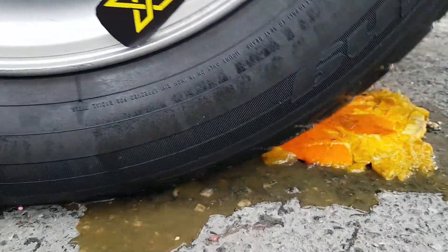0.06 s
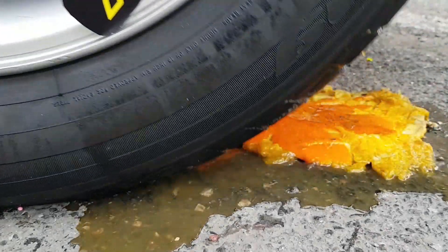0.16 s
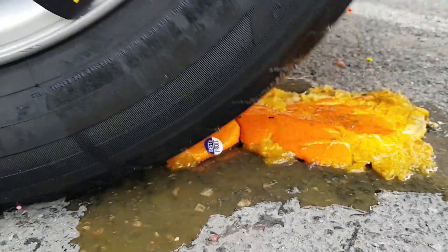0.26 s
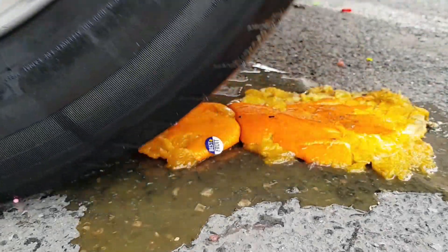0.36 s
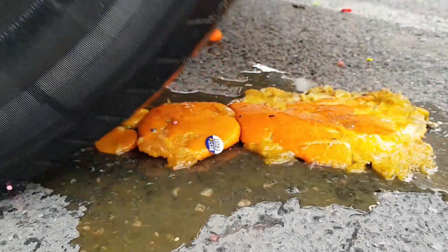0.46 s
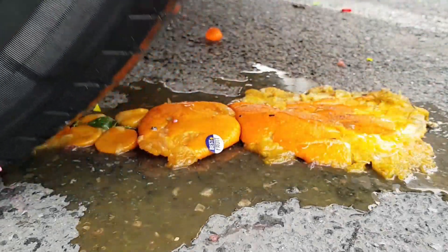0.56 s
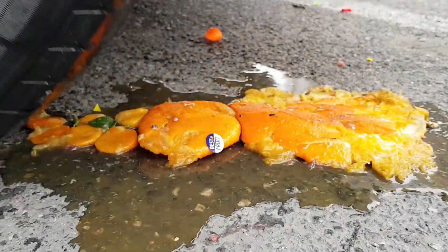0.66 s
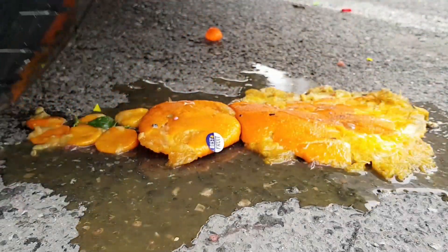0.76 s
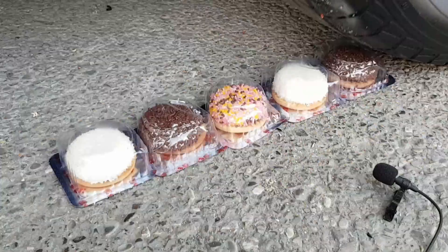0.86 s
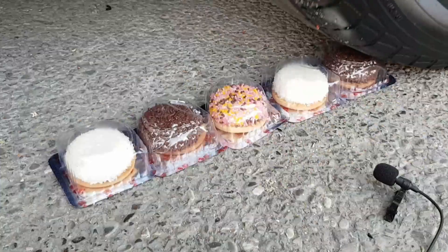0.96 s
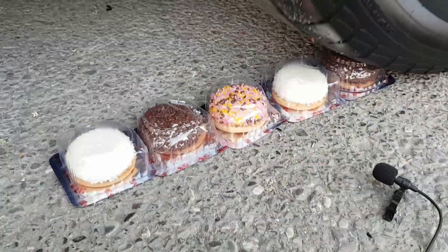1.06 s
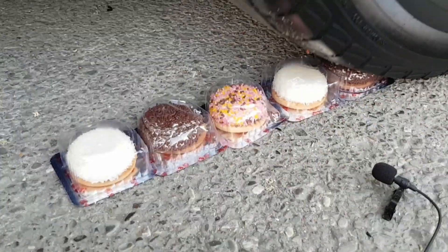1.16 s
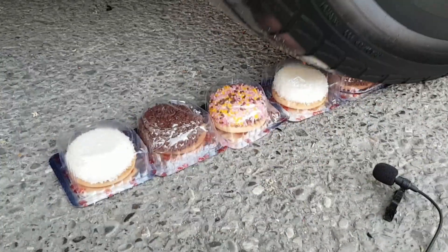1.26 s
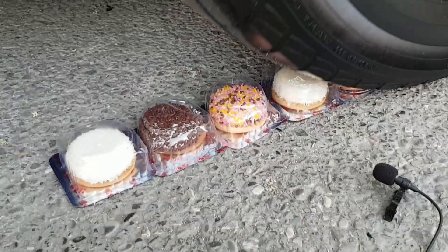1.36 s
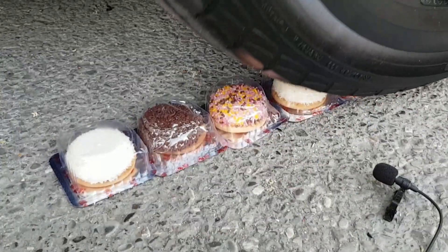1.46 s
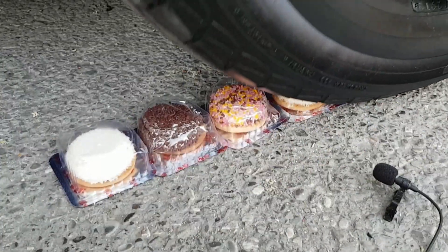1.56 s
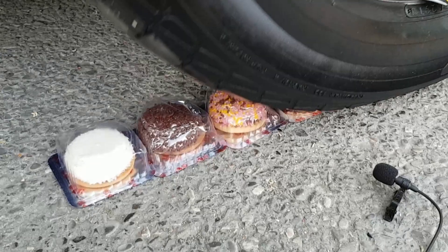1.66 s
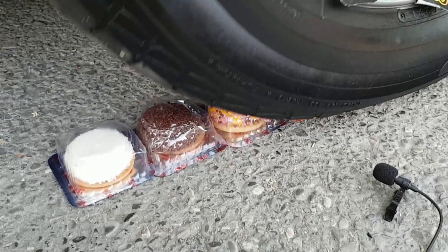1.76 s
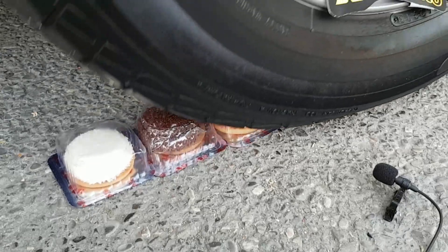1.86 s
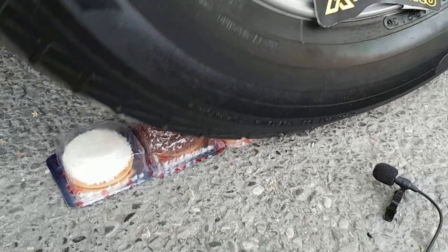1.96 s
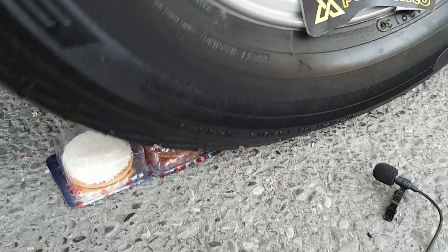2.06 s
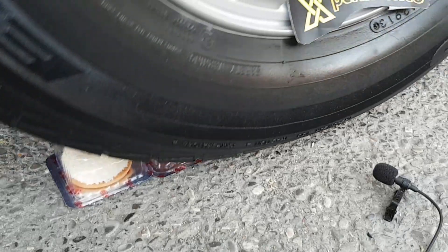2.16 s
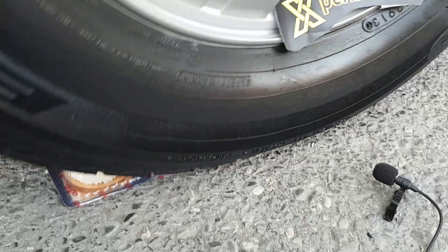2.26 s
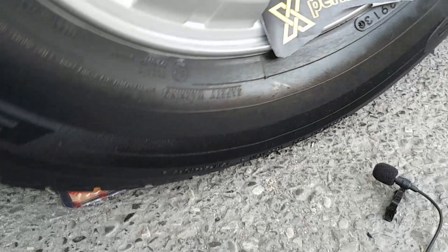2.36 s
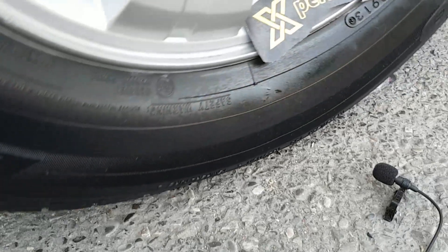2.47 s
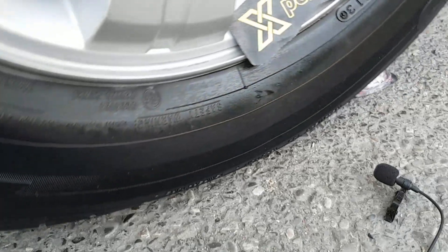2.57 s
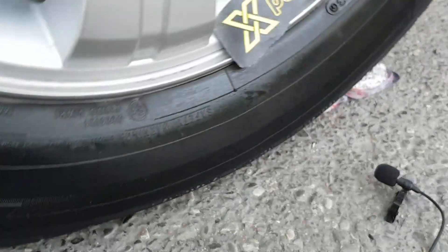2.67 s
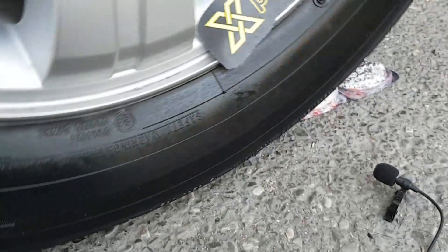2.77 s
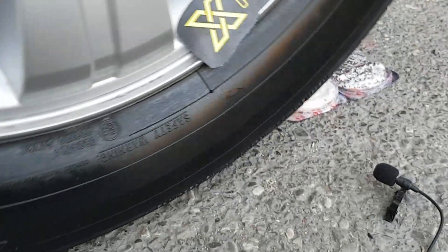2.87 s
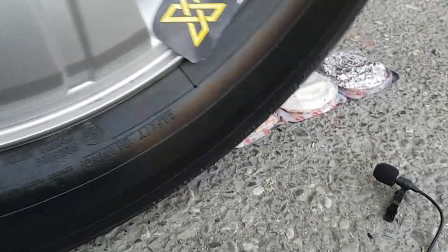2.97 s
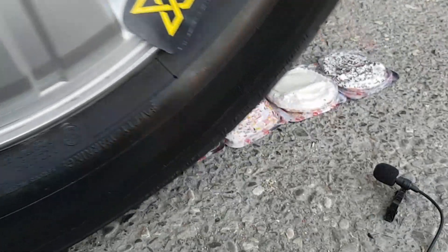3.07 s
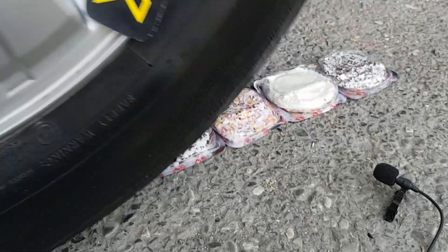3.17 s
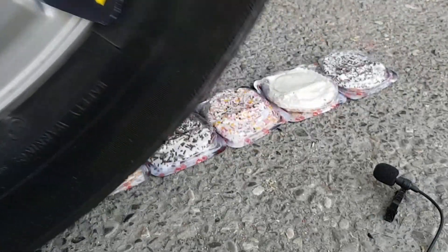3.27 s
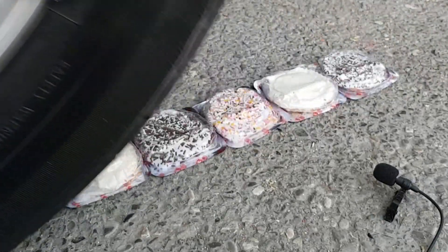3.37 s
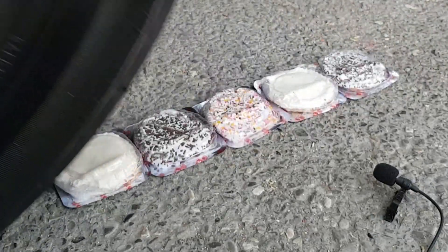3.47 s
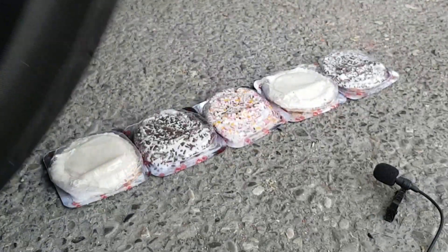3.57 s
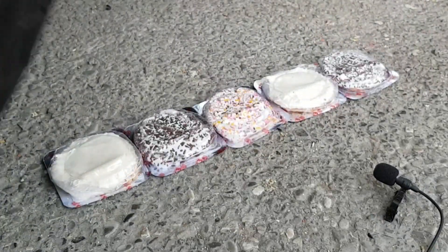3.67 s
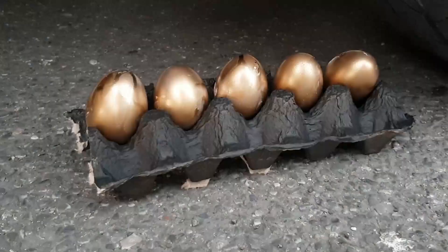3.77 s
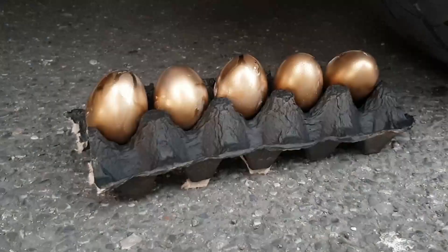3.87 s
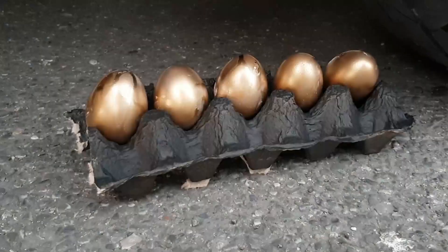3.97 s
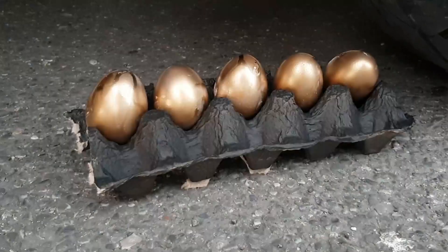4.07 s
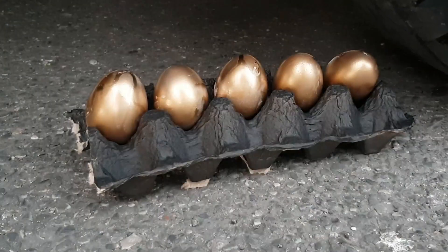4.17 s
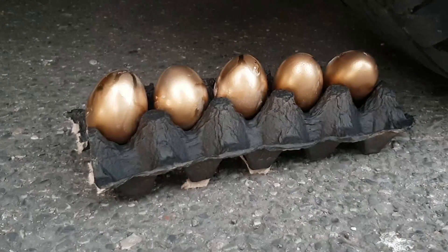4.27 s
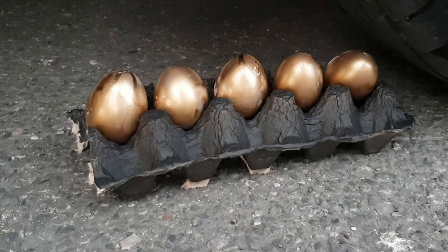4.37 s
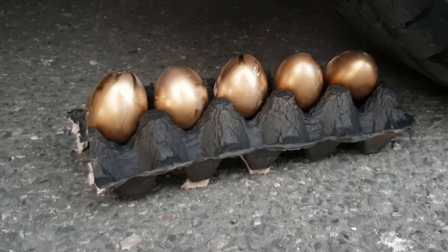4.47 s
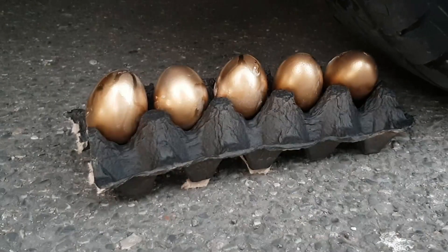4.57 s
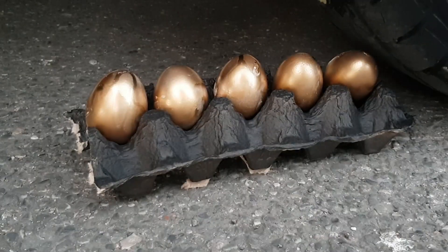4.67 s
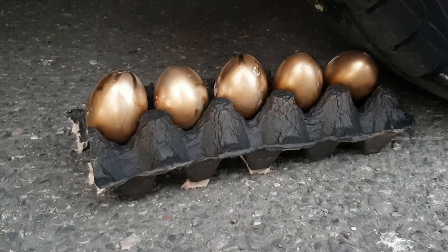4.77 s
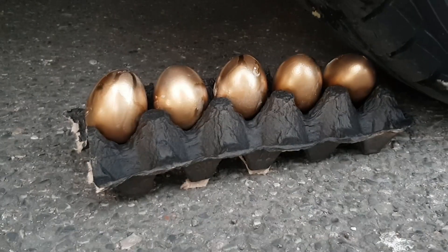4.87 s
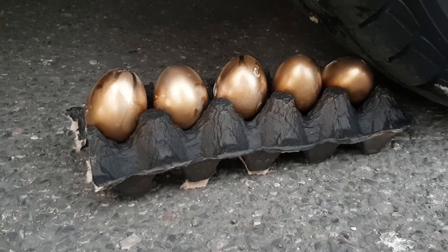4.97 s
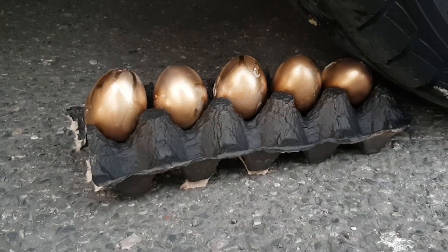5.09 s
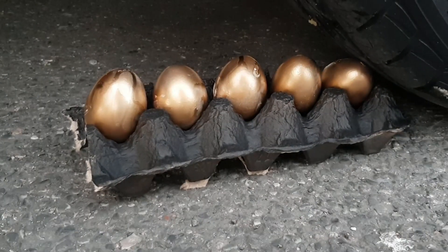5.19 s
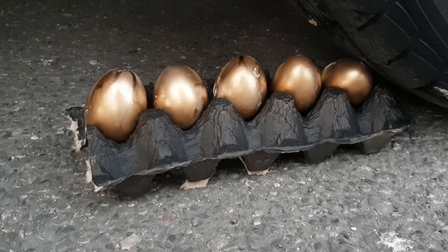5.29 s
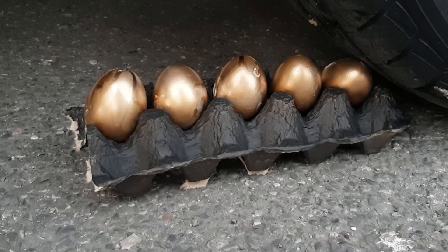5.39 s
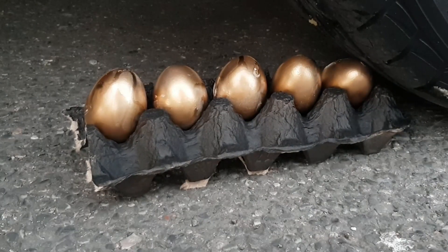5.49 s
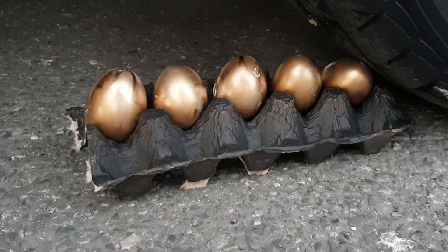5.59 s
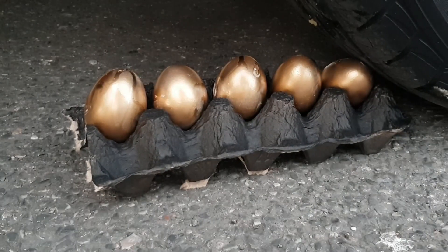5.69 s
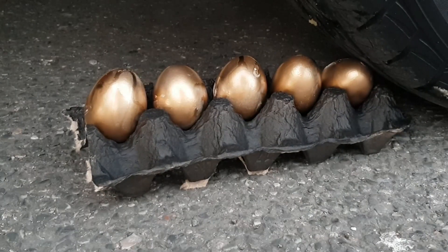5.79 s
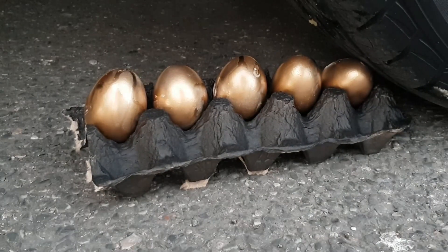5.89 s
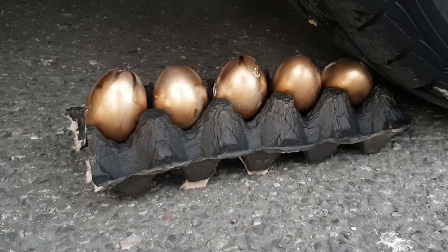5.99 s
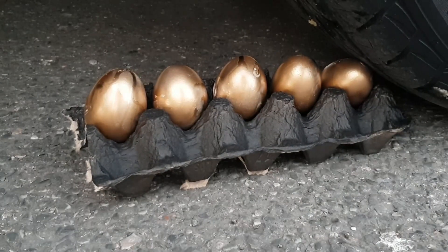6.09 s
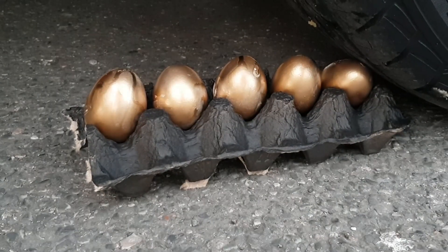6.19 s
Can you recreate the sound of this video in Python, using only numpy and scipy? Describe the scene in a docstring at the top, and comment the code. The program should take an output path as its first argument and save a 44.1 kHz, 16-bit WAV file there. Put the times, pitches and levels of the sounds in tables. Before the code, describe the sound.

A slow car tyre peels off pulpy fruit, crushes wrapped cakes with sharp pops and whistles, then cracks eggs in a pulp tray.

```python
"""Wind and street hiss come first, with squelches and ticks as a car tyre slowly peels off squashed fruit.
After a short silence it flattens a plastic pack of cakes, whose pockets snap, burst and whistle over far traffic.
After another silence it leans on a pulp egg tray, rubbing and cracking it, while the engine idles.
Coloured noise makes wind, traffic, engine and rubbing; noise bursts through resonances make the cracks;
sine waves make the squelches, whistles and low pushes. Left and right differ only in the fruit part."""
import sys
import numpy as np
from scipy.fft import rfft, irfft, next_fast_len
from scipy.io import wavfile
from scipy.ndimage import map_coordinates

SR = 44100
rng = np.random.default_rng(int(sys.argv[2]) if len(sys.argv) > 2 else 0)


def store_pcm(level_fs):
    """Save levels as 16-bit WAV."""
    pcm = np.round(np.clip(level_fs, -1, 1) * 32767).astype(np.int16)
    wavfile.write(sys.argv[1], SR, np.atleast_2d(pcm).T)


N = 275172
T = np.arange(N) / SR

# Silences between the three parts. Each row: start in seconds, end in seconds.
SILENCES = [(0.877, 0.908), (3.759, 3.806)]
# Resonances of stiff plastic film. Each row: pitch in Hz, width in Hz, relative level in dB.
FILM_MODES = [(2320, 1900, 5.5)]
# Resonances of hollow pulp cups. Each row: pitch in Hz, width in Hz, relative level in dB.
CUP_MODES = [(886, 280, 0)]
# Resonances of the pack's air pockets. Each row: pitch in Hz, width in Hz, relative level in dB.
POCKET_MODES = [(940, 290, -2.5), (1330, 310, -2), (2200, 490, -6.5)]
# Resonances of egg shells. Each row: pitch in Hz, width in Hz, relative level in dB.
SHELL_MODES = [(3250, 300, 0), (7600, 200, -10), (10700, 300, -15)]


def amp(db):
    """Turn a level in dB into a gain."""
    return 10 ** (np.asarray(db) / 20)


def unit(x):
    """Scale a signal to an rms of 1."""
    return x / np.sqrt(np.mean(x ** 2, axis=-1, keepdims=True) + 1e-20)


def curves(rows):
    """Draw straight lines between timed points: one curve for each column after the time."""
    seconds, *columns = np.transpose(rows)
    return [np.interp(T, seconds, column) for column in columns]


def wobble(rate):
    """Make a smooth random curve with `rate` random points a second."""
    points = rng.standard_normal(int(N * rate / SR) + 4)
    return map_coordinates(points, [T * rate])


def filtered(x, response):
    """Filter x by a gain (real or complex) that depends on frequency."""
    size = next_fast_len(x.shape[-1] + 1024)
    spectrum = rfft(x, size) * response(np.fft.rfftfreq(size, 1 / SR))
    return irfft(spectrum, size)[..., :x.shape[-1]]


def noise(spectrum):
    """Make noise of rms 1, coloured by points of frequency in Hz and relative level in dB."""
    points_hz, points_db = np.transpose(spectrum)

    def colour(hz):
        return amp(np.interp(np.log(hz + 1), np.log(points_hz), points_db, -120, -120))

    return unit(filtered(rng.standard_normal(N), colour))


def resonance(f, hz, width):
    """A simple resonance: gain 1 at its centre, and a narrower width rings longer."""
    return 1j * f * width / (hz * hz - f * f + 1j * f * width)


def body(modes):
    """Add up the resonances of an object, with alternating signs."""
    return lambda f: sum((-1) ** k * amp(db) * resonance(f, hz, width)
                         for k, (hz, width, db) in enumerate(modes))


def cracks(rows, skin, hollow, width, t60, skin_db, tail_db, tail_s, size=2048):
    """A sharp step and dying noise ring the crack's pitch and the skin, with a dull rattle and a hollow knock.

    Each row: start in seconds, peak of the spit in dB, pitch in Hz, knock in dB relative to the spit.
    width is a share of the pitch; t60 is the time in seconds in which a 5000 Hz crack's noise falls by 60 dB.
    """
    rows = np.asarray(rows, float)
    t = np.arange(size) / SR
    hz = np.clip(rows[:, 2:3], 800, 14000)
    draw = rng.standard_normal((len(rows), 3, size))
    squash = np.exp(0.15 * draw[:, 2, :1])  # each hollow is pressed to another size
    draw[:, :2, 0] = -2.44  # the first give is a sharp pull
    blow = draw[:, 0] * amp(-60 * t / (t60 * (5000 / hz) ** 0.13))  # deep cracks last longer

    # the freed patch rings at pitches of its own, set at random around the crack's
    low = hz * np.exp(0.51 * draw[:, 2, 1:2] - 0.45)
    high = np.minimum(hz * np.exp(0.27 * draw[:, 2, 2:3] + 0.45), 15000)

    def skin_ring(f):
        return amp(skin_db) * body(skin)(f)

    def spit_response(f):
        patch = resonance(f, low, 0.35 * low) - resonance(f, high, 0.057 * high)
        return resonance(f, hz, width * hz) ** 2 + 0.17 + 0.7 * patch + skin_ring(f)

    def peak(x):
        return x / np.abs(x).max(axis=1, keepdims=True)

    spit = filtered(blow, spit_response)
    rattle = filtered(draw[:, 2] * amp(-60 * t / tail_s), lambda f: resonance(f, 1800, 3000) + skin_ring(f))
    knock = filtered(draw[:, 1] * amp(-60 * t / 0.0097), lambda f: body(hollow)(f * squash))
    sound = peak(spit) + amp(tail_db) * peak(rattle) + amp(rows[:, 3:4]) * peak(knock)
    sound = amp(rows[:, 1:2]) * sound
    at = np.round(rows[:, :1] * SR).astype(int) + np.arange(size)
    return np.bincount(at.ravel(), sound.ravel(), N + size)[:N]


def crackle(times, curve_db, count, spread_db, hz):
    """Scatter random small snaps of varied size and pitch around a level curve, as rows for cracks()."""
    draw = rng.random((count, 3))
    when = times[0] + (times[-1] - times[0]) * draw[:, 0]
    level_db = np.interp(when, times, curve_db) - spread_db * np.log(draw[:, 1] + 0.01)  # few are loud
    pitch_hz = hz * 3.9 ** (2 * draw[:, 2] - 1)
    return np.transpose([when, level_db, pitch_hz, np.full(count, -26)])


def swings(rows, glide):
    """Add dying sine waves that start sharp (glide above 0) or flat (below 0) and settle to their pitch."""
    out = np.zeros(N)
    t = np.arange(SR // 5) / SR
    for s, hz, db, t60, *direction in rows:
        turns = hz * (t + glide * 0.0053 * (1 - np.exp(-t / 0.0028)))
        swing = amp(db - 60 * t / t60) * np.sin(2 * np.pi * turns)
        out[round(s * SR):][:len(t)] += np.sign(direction or 1) * swing
    return out


def wind_and_street():
    """Wind buffets two ports with partly shared low noise, the left one more; the street is a higher hiss."""
    # Levels before the left and right offsets. Each row: time in seconds, wind in dB, street in dB.
    levels = [(0, -35, -44.5), (.06, -25, -40), (.16, -31.5, -44), (.31, -31, -46.5), (.45, -30, -46.5),
              (.56, -30.5, -45.5), (.63, -26.5, -45.5), (.8, -29, -47.5), (.87, -27.5, -49.5)]
    # Colour of the wind. Each row: frequency in Hz, relative level in dB per Hz.
    wind_colour = [(15, -35), (25, -4.5), (54, 2), (123, 0), (190, -10.5), (322, -13), (500, -35),
                   (650, -37), (1100, -120)]
    # Colour of the street. Each row: frequency in Hz, relative level in dB per Hz.
    street_colour = [(250, -35.5), (330, -8.5), (590, 1.5), (1140, -10), (6250, -21), (8600, -35.5),
                     (11500, -24), (14300, -20), (15000, -55)]
    wind_db, street_db = curves(levels)
    shared = noise(wind_colour)
    ports = [unit(amp(2.89 * wobble(13.5)) * (0.736 * shared + noise(wind_colour))) for port in range(2)]
    wind = amp(wind_db + [[4], [-1.2]]) * ports  # offsets in dB: left, right
    street = amp(street_db + [[4], [2.2]]) * np.array([noise(street_colour), noise(street_colour)])
    return wind + street


def distant_traffic():
    """Far traffic is a wavering low rumble with a thin layer of airy noise."""
    # Each row: time in seconds, rumble in dB, air in dB.
    levels = [(.91, -34, -34.5), (1.05, -38, -43), (1.2, -44.5, -49.5), (1.6, -47, -51.5),
              (2.4, -50.5, -62), (2.7, -56, -56), (3, -52, -58), (3.2, -52.5, -60), (3.76, -49, -60)]
    # Colour of the rumble. Each row: frequency in Hz, relative level in dB per Hz.
    rumble_colour = [(15, -30), (25, -4.5), (54, -7.5), (206, -24), (332, -23.5), (400, -32.5), (520, -69),
                     (880, -120)]
    # Colour of the air. Each row: frequency in Hz, relative level in dB per Hz.
    air_colour = [(120, -53), (200, -17.5), (227, -9.5), (333, -9), (358, -10), (6830, -29.5), (8200, -24),
                  (15500, -44.5)]
    rumble_db, air_db = curves(levels)
    rumble = amp(rumble_db + 4.1 * wobble(8.4)) * noise(rumble_colour)
    return rumble + amp(air_db) * noise(air_colour)


def engine():
    """The idling engine is unsteady low noise, a hiss, and noise ringing in narrow whining resonances."""
    # Each row: time in seconds, rumble in dB, hiss in dB, whine over the hiss in dB.
    levels = [(3.81, -32, -42, -12.5), (4.1, -30, -39, -5.5), (4.3, -34.5, -43, -3.5),
              (4.7, -37, -42, -3.5), (5.1, -34.5, -43.5, -4), (5.4, -36, -45, -5.5), (5.7, -39, -44.5, -6),
              (6.24, -38.5, -44.5, -6)]
    # Colour of the rumble. Each row: frequency in Hz, relative level in dB per Hz.
    rumble_colour = [(15, -49), (25, -18), (54, 4), (86, -4), (119, 4), (163, -13.5), (231, -10.5),
                     (274, -16.5), (450, -23), (580, -58), (990, -120)]
    # Colour of the hiss. Each row: frequency in Hz, relative level in dB per Hz.
    hiss_colour = [(250, -10.5), (330, -1), (700, -1), (900, -7.5), (1800, -9), (3700, -14.5),
                   (7000, -19.5), (10500, -17.5), (15800, -28)]
    # Hum and reedy hiss. Each row: pitch in Hz, width in Hz, relative level in dB.
    whine_modes = [(619, 32, 11), (7860, 53, -1.5), (8445, 200, 5.5), (8587, 300, -1.5), (8960, 70, 5),
                   (9760, 160, -3.5)]
    rumble_db, hiss_db, whine_db = curves(levels)
    rumble = amp(rumble_db + 2.15 * wobble(19)) * noise(rumble_colour)
    whine = unit(filtered(rng.standard_normal(N), body(whine_modes)))
    whine = amp(whine_db + 0.4 * wobble(15)) * whine
    return rumble + amp(hiss_db) * (noise(hiss_colour) + whine)


def pushes():
    """Pushes of air and ground at the microphone are low swings that die within a few cycles."""
    # Each row: start in seconds, pitch in Hz, starting level in dB, 60 dB fall time in seconds, direction (+1 or -1).
    rows = [(1.562, 59.7, -12, 0.042, -1), (1.9454, 62.3, -12.5, 0.066, 1), (1.969, 56, -6, 0.088, 1),
            (2.001, 58.6, -19, 0.14, -1), (2.275, 62, -16.5, 0.097, 1), (2.772, 64.5, -24.5, 0.078, 1),
            (4.003, 59.2, -19.5, 0.15, -1), (4.788, 78, -18, 0.13, 1), (5.025, 77, -8, 0.058, -1),
            (5.314, 70, -13, 0.0356, -1)]
    return swings(rows, glide=0.7)


def wet_fruit():
    """Pulp sucks free in small bubbles that ring as short sines; the lifting tread makes wet ticks."""
    # Ticks. Each row: start in seconds, peak in dB, pitch in Hz, hollow knock over the peak in dB;
    # the left and right offsets come on top of the peak.
    ticks = [(0.0504, -32, 1480, 8), (0.3684, -20, 5530, -38.5), (0.4927, -25.5, 4590, -6),
             (0.6902, -35.5, 2900, 9)]
    # Bubbles, before the same offsets. Each row: start in seconds, pitch in Hz, starting level in dB,
    # 60 dB fall time in seconds.
    bubbles = [(.0505, 1080, -14, 0.012), (.056, 1154, -22, 0.047), (.058, 2180, -37, .04),
               (.104, 2450, -40, 0.018), (.077, 1250, -31.5, 0.042), (.099, 955, -26, 0.042),
               (.131, 1190, -24.5, 0.012)]
    pulp = cracks(ticks, FILM_MODES, CUP_MODES, width=5.7, t60=0.0041, skin_db=-32, tail_db=-10.5, tail_s=0.07)
    pulp = pulp + swings(bubbles, glide=-0.042)
    late = np.roll(pulp, 23)  # the pulp reaches the right port 23 samples later
    return amp([[5], [-6]]) * [pulp, late]  # offsets in dB: left, right


def rubber_drags():
    """Rubber dragging on pulp is short swells of noise, and bits of shell break meanwhile."""
    # Each row: start in seconds, length in seconds, level before the swell in dB, centre in Hz, width in Hz.
    drags = [(3.988, 0.048, -37, 4520, 6000), (4.032, 0.1086, -42, 5000, 7000),
             (4.178, 0.06, -38, 4900, 7000), (4.784, 0.02, -37, 5140, 5030),
             (4.882, 0.07, -32.5, 5360, 7040), (4.964, 0.0544, -32.5, 6000, 9000),
             (5.015, 0.03, -32, 9300, 2500), (5.075, 0.076, -47, 9800, 2200),
             (5.265, 0.059, -35, 6000, 9000)]
    out = np.zeros(N)
    crumbs = []
    for s, length, db, hz, width in drags:
        raw = rng.standard_normal(round(length * SR))
        fizz = unit(filtered(raw, lambda f: resonance(f, hz, width) ** 2))
        out[round(s * SR):][:len(fizz)] += amp(db) * np.hanning(len(fizz)) ** 0.82 * fizz
        crumbs.append(crackle([s, s + length], [db + 1.5] * 2, count=12, spread_db=3, hz=3500))
    return out + cracks(np.vstack(crumbs), SHELL_MODES, CUP_MODES, width=0.6, t60=0.004,
                        skin_db=-17, tail_db=-18, tail_s=0.023, size=512)


def tray_cracks():
    """Shells and pulp crack: sharp bursts ring the egg shells strongly and knock in the cups."""
    # Each row: start in seconds, peak in dB, pitch in Hz, hollow knock over the peak in dB.
    rows = [(3.9979, -24.5, 4700, -10), (4.1423, -20.5, 3000, -7), (4.1627, -1, 7580, -19),
            (4.1757, -3, 3730, -12), (4.2103, -20, 5600, -5.5), (4.2396, -23.5, 3200, -3),
            (4.2812, -19, 5530, -10), (4.4663, -31.5, 3200, 5.5), (4.53, -7.5, 3200, -29),
            (4.5534, -23.5, 3100, 1.5), (4.823, -16.5, 3340, -1), (4.8972, -6.5, 6400, -6),
            (4.9842, -15, 4100, -5), (4.9903, -3.5, 3600, -16.5), (4.9966, -16, 3380, 0),
            (5.0052, -11.5, 3100, -5), (5.0148, -4.5, 3050, -5.5), (5.0279, -13.5, 3000, -7),
            (5.2227, -6.5, 3170, -12.5), (5.2668, -22, 4100, -1), (5.2777, -6.5, 3130, -14.5),
            (5.2944, -4, 4180, -13.5), (5.3081, -22, 5000, -1), (5.3245, -16.5, 4140, -15.5),
            (5.3633, -10, 2880, -5.5), (5.3712, -19.5, 3500, -6.5), (5.9798, -27, 4000, -2)]
    return cracks(rows, SHELL_MODES, CUP_MODES, width=1.6, t60=0.005, skin_db=13, tail_db=-13, tail_s=0.045)


def seeping_air():
    """The last air seeps from the flat pack as a soft, wavering hiss."""
    # Each row: time in seconds, level in dB.
    levels = [(2.42, -69), (2.62, -57), (2.8, -52), (3.03, -65), (3.15, -75), (3.76, -85)]
    hiss = unit(filtered(rng.standard_normal(N), lambda f: resonance(f, 8000, 8200) ** 2))
    return (T > levels[0][0]) * amp(curves(levels)[0] + 1.5 * wobble(30)) * hiss


def bursting_pockets():
    """Bursting air pockets let out a dying bright hiss and a shorter low puff."""
    # Each row: start in seconds, starting hiss in dB, hiss 60 dB fall time in seconds,
    # centre of the hiss in Hz, starting puff in dB.
    bursts = [(1.4651, -7.5, 0.088, 4000, -24.5), (1.562, -18, 0.057, 4000, -14),
              (1.964, -10, 0.084, 3505, -9), (2.002, -18.5, 0.11, 6000, -13.5),
              (2.2723, -14.5, 0.082, 1930, -17.5), (2.7692, -4.5, 0.078, 9000, -23.5)]
    out = np.zeros(N)
    t = np.arange(SR // 8) / SR
    for s, db, t60, hz, puff_db in bursts:
        raw = rng.standard_normal((2, len(t)))
        hiss, puff = unit(filtered(raw, lambda f: [resonance(f, hz, 11.0 * hz), resonance(f, 130, 380)]))
        burst = amp(db - 60 * t / t60) * hiss + amp(puff_db - 60 * t / (0.71 * t60)) * puff
        out[round(s * SR):][:len(t)] += burst
    return out


def whistling_slits():
    """Air squeezed through slits whistles unsteadily, its pitch sagging as the pressure drops."""
    # Pitch and level before the flutter. Each row: start in seconds, length in seconds,
    # first pitch in Hz, last pitch in Hz, peak in dB.
    slits = [(1.466, 0.0056, 11900, 11400, -5.5), (1.474, .005, 12200, 12100, -5),
             (1.481, 0.011, 13700, 12900, -5), (1.491, 0.0067, 12000, 11220, -6),
             (1.507, .0055, 12300, 10500, -26), (1.512, .012, 9100, 9030, -26),
             (2.004, .0095, 14680, 12200, -0.5), (2.014, 0.006, 12960, 12320, -2.5),
             (2.018, 0.0064, 11200, 9630, -3.5), (2.778, 0.012, 6300, 5600, -18)]
    sag_power, edge_s = 1.2, 0.00085  # shape of the sag; fade at either end in seconds
    out = np.zeros(N)
    flutter, waver = wobble(870), wobble(400)
    for s, length, first_hz, last_hz, db in slits:
        u = np.clip((T - s) / length, 0, 1)
        hz = first_hz + (last_hz - first_hz) * u ** sag_power
        hz = hz * (1 + 0.0078 * flutter + 0.005 * waver)
        edge = np.clip(np.minimum(u, 1 - u) * length / edge_s, 0, 1)
        out += edge * amp(db + 1.4 * flutter + 3.3 * waver) * np.sin(2 * np.pi * np.cumsum(hz) / SR)
    return out


def buckling_pockets():
    """A pocket hums briefly after its wall buckles, starting a little flat."""
    # Each row: start in seconds, pitch in Hz, starting level in dB, 60 dB fall time in seconds.
    rows = [(1.0545, 907, -13.5, 0.044), (1.059, 970, -15, 0.03), (1.0715, 1100, -11.5, 0.034),
            (1.416, 995, -14.5, 0.035), (2.064, 1015, -24.5, 0.046)]
    return swings(rows, glide=-0.093)


def load(s):
    """Levels in dB at times s: both rise into a load; crackle fades after it, trapped air leaks from its start."""
    # The tread presses each pocket flat, later the film springs back.
    # Each row: start in seconds, end in seconds, crackle in dB, trapped air in dB.
    loads = [(0.926, .99, -45, -16), (1.02, 1.155, -23.5, -13), (1.369, 1.53, -25.5, -14.5),
             (1.692, 1.76, -25.5, -17), (1.792, 1.846, -32.5, -26), (2.02, 2.11, -27, -15.5),
             (2.16, 2.26, -39.5, -44), (2.287, 2.383, -30.5, -13.5), (2.43, 2.493, -35.5, -33.5),
             (2.56, 3.056, -47, -40), (2.776, 2.79, -41, -30.5), (3.212, 3.263, -46, -32)]
    rise, fall, leak = 201, 297, 91  # dB per second; the leak is the trapped air escaping
    relax_db, relax = -18, 28  # slow ticking left behind: its drop in dB, its fade in dB per second
    start, end, db, air_db = np.transpose(loads)[:, :, None]
    early, late = np.maximum(start - s, 0), np.maximum(s - end, 0)
    fall_db = np.maximum(-fall * late, relax_db - relax * late)
    crackle_db = (db - rise * early + fall_db).max(0)
    trapped_db = (air_db - rise * early - leak * np.maximum(s - start, 0)).max(0)
    return crackle_db, trapped_db


def film_creases():
    """Creasing film crackles in many tiny snaps, louder and denser when the load is high."""
    thinning = 0.23  # ticks grow rarer by this share of each dB that the crackle drops
    times = np.linspace(SILENCES[0][1], SILENCES[1][0], 600)
    level_db = load(times)[0]
    small = crackle(times, level_db, count=1700, spread_db=4.5, hz=4240)
    drop_db = load(small[:, 0])[0] - level_db.max()
    small[rng.random(len(small)) > amp(thinning * drop_db), 1] = -200  # silent
    return cracks(small, FILM_MODES, POCKET_MODES, width=0.39, t60=0.0035,
                  skin_db=-25, tail_db=-13, tail_s=0.018, size=512)


def plastic_snaps():
    """Plastic snaps ring the film and knock the trapped air; the knock fades as the air leaves."""
    # Each row: start in seconds, peak in dB, pitch in Hz.
    rows = [(0.9262, -11, 2970), (.99, -5.5, 4355), (1.0135, -2.5, 4710), (1.027, 2.5, 4510),
            (1.0326, -4.5, 5970), (1.0429, 2.5, 4910), (1.054, -4.5, 2830), (1.0679, -6.5, 5500),
            (1.0706, -5.5, 2880), (1.0865, 7.5, 4280), (1.0944, 2, 5500), (1.1043, -8, 5930),
            (1.115, 0.5, 5350), (1.1264, 4, 5600), (1.1366, -0.5, 5480), (1.141, -7, 4270),
            (1.146, -2, 3020), (1.1498, 1, 5800), (1.1678, -5, 3064), (1.2097, -12.5, 4400),
            (1.2206, -9, 5360), (1.271, -19, 7040), (1.2879, -20, 8030), (1.302, -27.5, 7100),
            (1.3338, -16, 2880), (1.3551, -8, 6470), (1.3745, -7, 5060), (1.3985, 4.5, 7810),
            (1.4137, -5.5, 3900), (1.417, 3.5, 4810), (1.4278, 1, 6777), (1.4345, -6, 6150),
            (1.4409, -2, 2627), (1.4555, 10, 7520), (1.4782, -9.5, 5800), (1.5024, 5, 3820),
            (1.5144, -11, 4570), (1.5249, 3, 4200), (1.5633, -0.5, 3527), (1.58, -2, 6770),
            (1.6115, -16.5, 3680), (1.6692, -15, 4896), (1.7081, 0, 4090), (1.726, -6, 6550),
            (1.7506, 3.5, 9100), (1.7628, -6.5, 7220), (1.7747, 4, 6906), (1.7964, -15, 2980),
            (1.8054, -3, 5850), (1.8121, 3, 5770), (1.8315, 3.5, 2700), (1.8389, 1, 9094),
            (1.861, -5.5, 7740), (1.8824, -5, 7530), (1.9158, -1.5, 5530), (1.9238, -14.5, 6900),
            (1.9448, 7, 8340), (1.9639, -6.5, 6000), (2.0018, 14.5, 7858), (2.0363, -6.5, 8065),
            (2.0743, 2, 7300), (2.0796, -4.5, 7000), (2.086, -11, 6100), (2.1078, -10.5, 6030),
            (2.1217, -12, 2580), (2.1317, -7.5, 8670), (2.1613, -1.5, 3900), (2.1786, -0.5, 6906),
            (2.2001, -9, 4700), (2.21, 0.5, 2917), (2.2249, -11, 5720), (2.2547, -2.5, 5090),
            (2.2726, 4.5, 2460), (2.3198, -16.5, 2770), (2.3387, -13, 4230), (2.3492, -6.5, 4160),
            (2.3659, -8, 2390), (2.3913, -9, 9160), (2.3973, -12, 2700), (2.4371, -1, 5240),
            (2.4568, -16.5, 3200), (2.4728, -10, 4870), (2.486, -28, 4100), (2.5463, -25.5, 5600),
            (2.571, -21, 6140), (2.5938, -20, 6550), (2.7149, -11.5, 8700), (2.8253, -19, 6315),
            (2.8746, -22.5, 10500), (2.902, -21.5, 9250), (2.9561, -27, 5500), (2.99, -19.5, 8800),
            (3.0451, -30.5, 6200), (3.0597, -30, 7118), (3.1011, -32, 8000), (3.207, -21.5, 9800),
            (3.2519, -31, 5130), (3.3745, -34.5, 5506), (3.4599, -13, 6630)]
    follows = 0.53  # dB of knock gained for each dB of snap
    s, db, hz = np.transpose(rows)
    knock_db = load(s)[1] - (1 - follows) * db  # relative to the snap
    knock_db = knock_db - 6 * np.log2(hz / hz.mean())  # deep snaps knock more: 6 dB per octave
    knock_db = knock_db + 4.5 * rng.standard_normal(len(s))
    return cracks(np.transpose([s, db, hz, knock_db]), FILM_MODES, POCKET_MODES, width=1.62, t60=0.0051,
                  skin_db=-10.5, tail_db=-21.5, tail_s=0.023)


def scene():
    """Play the fruit, the pack and the tray in turn, with silences between them."""
    (fruit_end, pack_start), (pack_end, tray_start) = SILENCES
    fruit = wind_and_street() + wet_fruit()
    air = seeping_air() + bursting_pockets() + whistling_slits()
    pack = distant_traffic() + air + buckling_pockets() + film_creases() + plastic_snaps()
    tray = engine() + rubber_drags() + tray_cracks()
    fade_in = np.clip((T - tray_start) / 0.011, 0, 1)
    parts = (T < fruit_end) * fruit + ((T > pack_start) & (T < pack_end)) * pack + fade_in * tray
    return parts + pushes()


def record(dry):
    """The microphone dulls the top, soft clipping flattens loud snaps, and a last filter stops the highest treble."""
    capsule = filtered(dry, lambda hz: 1 / np.sqrt(1 + (hz / 14200) ** 12))
    clipped = capsule / (1 + np.abs(capsule / 0.92) ** 8) ** (1 / 8)
    return filtered(clipped, lambda hz: np.clip((16500 - hz) / 700, 0, 1) ** 2)  # fades from 15800 Hz


dry = scene()
out = record(dry)
store_pcm(out)
```